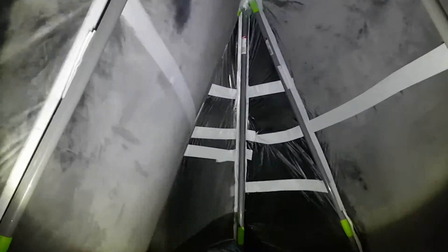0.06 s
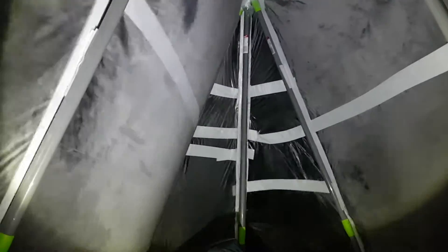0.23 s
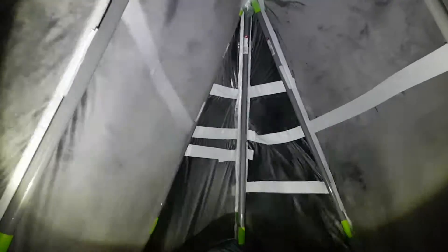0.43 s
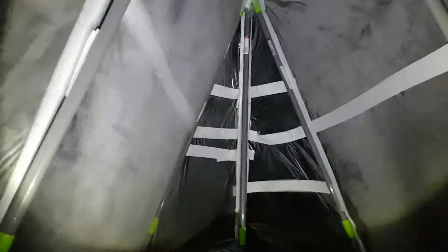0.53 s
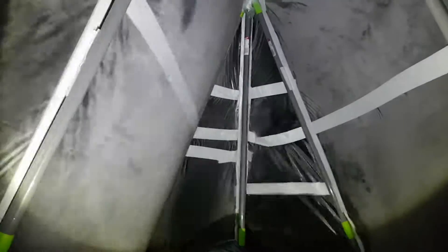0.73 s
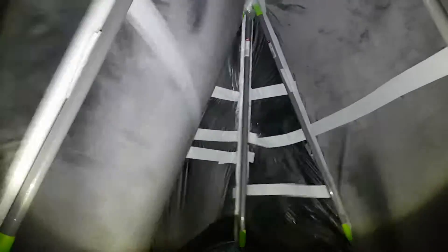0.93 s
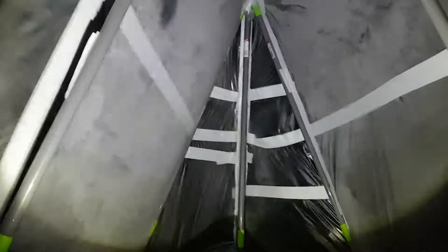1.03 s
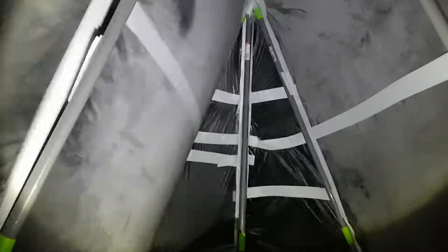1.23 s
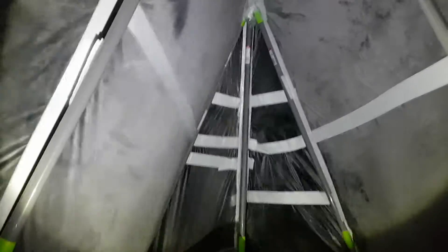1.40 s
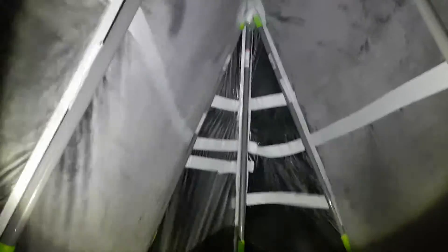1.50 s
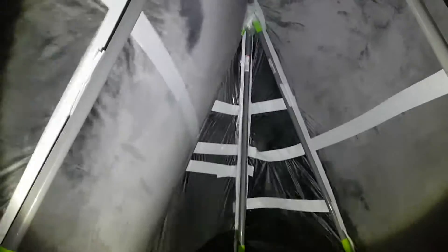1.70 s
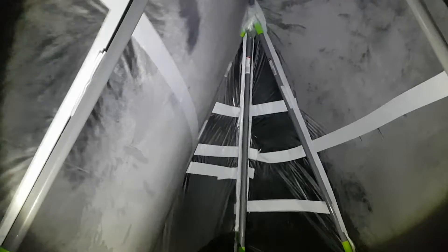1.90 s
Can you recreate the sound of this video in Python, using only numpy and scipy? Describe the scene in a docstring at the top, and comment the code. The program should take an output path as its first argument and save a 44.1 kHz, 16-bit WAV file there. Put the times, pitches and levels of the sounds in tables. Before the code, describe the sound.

Plastic sheeting of a small tent flaps, crackles and snaps in gusty wind, heard close inside

```python
"""Inside a taped plastic tent in gusty wind

A small tent of plastic sheeting is heard by a two-port camera microphone. Gusts drum the slack panels as
soft random blows over noise; creases crackle as dense clicks; thin film swishes past itself in bright grains
over a faint steady hiss. Now and then a panel snaps taut: a noise crack with a hollow knock, and a thump of
decaying sines. The small enclosure smears every click and adds a short tail."""
import sys
import numpy as np
from scipy import signal
from scipy.fft import rfft, irfft, next_fast_len
from scipy.io import wavfile
from scipy.ndimage import uniform_filter1d

SR = 44100
rng = np.random.default_rng(int(sys.argv[2]) if len(sys.argv) > 2 else 0)


def digitize_waveform(pressure):
    """Quantize a signal to 16-bit integers and store it at the path in sys.argv[1].

    Rows of a 2-D input are taken as channels; values are limited to [-1, 1].
    """
    field = np.atleast_2d(pressure).T
    bounded = np.clip(field, -1, 1)
    quanta = np.round(bounded * 32767).astype(np.int16)
    wavfile.write(sys.argv[1], SR, quanta)


def voltage_ratio(level):
    """Linear amplitude factor for a level in decibels (scalar or array-like)."""
    return 10 ** (np.asarray(level, float) / 20)


N = 85995
SPOTS = 12  # places on the walls where the sheet works


def read(table, hz):
    """Reads a table of (Hz, value) on a log frequency axis, holding the end values."""
    f, value = np.array(table, float).T
    return np.interp(np.log(np.maximum(hz, 1)), np.log(f), value)


def colour(x, table):
    """Causal minimum-phase filter with the given spectrum, scaled to keep white noise at its rms."""
    size = next_fast_len(N + 8192)
    hz = np.arange(2049) * SR / 4096
    low_end = (table[0][0] / 2, table[0][1] - 12)  # 12 dB down an octave below the first row
    db = read([low_end] + list(table), hz)
    cepstrum = np.fft.irfft(db * np.log(10) / 20)
    # folding the cepstrum makes the filter causal
    cepstrum[1:2048] *= 2
    cepstrum[2049:] = 0
    h = np.fft.irfft(np.exp(np.fft.rfft(cepstrum)))
    h = h / np.sqrt(np.sum(h ** 2))
    return irfft(rfft(x, size) * rfft(h, size), size)[..., :N]


def walk(rate_hz):
    """Random levels held 1 / rate_hz seconds each and slewed twice; standard deviation 1."""
    hold = int(SR / rate_hz)
    steps = np.repeat(rng.standard_normal(N // 100), hold)[:N]
    w = uniform_filter1d(uniform_filter1d(steps, hold), hold)
    return w / w.std()


def clicks(per_s, scatter_db):
    """Random clicks of both signs, many small and few large; rms 1."""
    chance, sign, size = rng.random(N), rng.standard_normal(N), rng.exponential(size=N)
    happens = chance < per_s / SR
    x = happens * np.sign(sign) * voltage_ratio(scatter_db * np.minimum(size, 4.5))
    return x / x.std()


def scatter(x, hold_s):
    """Hands the sound at random from place to place on the walls, hold_s seconds at each."""
    place = np.repeat(rng.integers(0, SPOTS, N), max(int(hold_s * SR), 1))[:N]
    return x * (place == np.arange(SPOTS)[:, None])


# The gusts as they drive the sheet, before flutter.
# Each row: time in seconds, drumming of the panels in dB, crackle of the creases in dB.
GUSTS = [(0, -32.5, -35), (.064, -33.5, -35.5), (.17, -32, -35), (.225, -27.5, -27), (.282, -21.5, -22.5),
         (.35, -25.5, -26), (.384, -22, -25), (.41, -16, -20.5), (.445, -19.5, -21.5), (.475, -17.5, -24.5),
         (.53, -23, -23), (.564, -21, -25.5), (.596, -21.5, -22), (.65, -22.5, -21), (.70, -22, -25.5),
         (.732, -21, -22), (.782, -20, -21), (.84, -20.5, -23.5), (.89, -16, -19.5), (.938, -19, -21),
         (.97, -19.5, -26.5), (1.03, -19.5, -20), (1.062, -26.5, -25.5), (1.09, -16, -24),
         (1.14, -27.5, -27), (1.185, -21.5, -24), (1.222, -33, -34), (1.26, -33.5, -25), (1.31, -26.5, -32),
         (1.355, -28, -29), (1.39, -27, -26), (1.43, -27, -27), (1.454, -28, -33), (1.51, -29, -32),
         (1.54, -33.5, -37), (1.606, -37.5, -41), (1.70, -34, -36.5), (1.764, -36.5, -40.5),
         (1.824, -31.5, -41.5), (1.894, -34.5, -38.5), (1.95, -37, -45.5)]
# Spectrum of a slack panel. Each row: frequency in Hz, relative level in dB per Hz.
PANEL_COLOUR = [(12, -16), (20, -18.5), (75, -0.5), (134, -2), (173, -5), (244, -4), (429, -13.5),
                (659, -16), (1200, -22), (1560, -27), (2640, -120)]


def drumming(t, flutter_db):
    """Eddies push the slack panels: soft random blows over turbulent pressure, nearly alike at both ports."""
    push = 0.76 * clicks(per_s=400, scatter_db=2) + rng.standard_normal(N)
    side = voltage_ratio(-13) * rng.standard_normal(N)
    ports = push + side * np.array([[1], [-1]])
    gust_s, gust_db, _ = np.array(GUSTS).T
    db = np.interp(t, gust_s, gust_db) + 0.52 * flutter_db  # the drumming flutters less than the creases
    return colour(voltage_ratio(db) * ports, PANEL_COLOUR)


# Spectrum of the buckling creases. Each row: frequency in Hz, relative level in dB per Hz.
CREASE_COLOUR = [(150, -41.5), (250, -17), (330, -9.5), (372, -14.5), (594, -10.5), (2820, -14),
                 (6150, -26.5), (7700, -27.5), (9150, -36.5), (13600, -38.5), (15600, -43)]


def creases(t, flutter_db):
    """Dense buckling clicks of the crumpled sheet, in flurries as the panels flutter."""
    gust_s, _, crackle_db = np.array(GUSTS).T
    db = np.interp(t, gust_s, crackle_db) + flutter_db + 0.2 * walk(60.43)
    crackle = voltage_ratio(db) * clicks(per_s=4000, scatter_db=2.5)
    return colour(scatter(crackle, hold_s=.0002), CREASE_COLOUR)


# Swishes of film sliding over film. Each row: centre in seconds, length in seconds, level in dB.
SWISHES = [(0.065, 0.042, -35), (0.11, 0.02, -33), (0.153, 0.045, -38), (0.31, .09, -38),
           (0.386, 0.017, -23.5), (.41, 0.046, -29.5), (0.504, 0.0043, -28), (0.531, 0.038, -32),
           (0.59, .02, -38), (0.653, 0.059, -33.5), (0.698, .022, -27), (0.793, 0.046, -36.5),
           (0.886, 0.02, -28.5), (1.024, .005, -28), (1.064, .005, -33), (1.076, .004, -30),
           (1.099, .004, -30), (1.266, .032, -33), (1.339, .005, -33), (1.357, .003, -35),
           (1.37, .015, -36), (1.41, .06, -37), (1.502, .005, -38), (1.673, 0.03, -46), (1.755, 0.028, -44),
           (1.802, .006, -51), (1.903, .008, -47)]
# Spectrum of the thin film. Each row: frequency in Hz, relative level in dB per Hz.
FILM_COLOUR = [(800, -18), (2000, -7), (4000, -2), (7500, -3), (8800, -9), (10500, -9), (13000, -3),
               (15700, -8)]


def film(t):
    """Bright fine grains swell and fade while layers of thin film slide over each other."""
    power = voltage_ratio(2 * -55) * np.ones(N)  # a steady faint hiss at -55 dB lies under the swishes
    for centre_s, length_s, db in SWISHES:
        power += voltage_ratio(2 * db) * np.exp(-((t - centre_s) / (.6 * length_s)) ** 2)
    waver = voltage_ratio(0.31 * walk(43.9))
    grains = waver * np.sqrt(power) * clicks(per_s=6000, scatter_db=2.5)
    return colour(scatter(grains, hold_s=.0002), FILM_COLOUR)


# Snaps of a panel pulled taut.
# Each row: start in seconds, crack in dB, thump in dB, crack pitch in Hz, thump pitch in Hz.
SNAPS = [(.110, -30, -23, 2600, 150), (0.27, -21, -30, 1970, 129), (0.3857, -11.5, -31, 2850, 201),
         (0.4011, -8, -15, 1930, 152), (.415, -21, -32, 2000, 170), (0.4223, -19, -36, 2980, 130),
         (0.4334, -30, -10.5, 2940, 117), (0.5894, -18.5, -21, 1440, 140), (.782, -30, -10, 2500, 200),
         (0.715, -17, -33, 2500, 140), (0.8478, -14.5, -24, 2600, 108), (.880, -14.5, -40, 2500, 190),
         (1.004, -10.5, -26, 1880, 139), (1.0738, -7, -3, 3200, 130), (1.0850, -12, -18, 3300, 140),
         (1.0985, -28, -36, 5000, 127), (1.123, -21, -24, 2200, 138), (1.194, -31, -28, 2930, 140),
         (1.253, -31, -20, 3220, 200), (1.270, -20, -17, 2640, 196), (1.338, -33, -7.5, 5000, 239),
         (1.344, -17.5, -27, 2460, 250), (1.3676, -19.5, -10, 2770, 171), (1.3715, -19, -13, 2780, 200),
         (1.397, -20, -18, 2600, 200), (1.4025, -6, -13, 2400, 330), (1.4155, -8, -9, 1800, 240),
         (1.4385, -22, -17, 3000, 240), (1.4715, -17, -18, 2200, 240), (1.5015, -22, -15, 3000, 230),
         (1.812, -36, -48, 4500, 170), (1.905, -32.5, -38, 5000, 170)]
# Modes of the taut panel. Each row: multiple of the thump pitch, level in dB, cycles to fall 60 dB.
SNAP_MODES = [(1, 12, 2.5), (2.15, -8.5, 5.5)]


def snaps():
    """A snap is a short noise crack with a hollow knock, and a thump of the panel pulled inward first."""
    crack_decay_s = .0011
    knock_hz, knock_db, knock_t60_s = 720, 3, 0.022  # level relative to the crack
    t = np.arange(4096) / SR
    cracks, thumps = np.zeros((SPOTS, N + 4096)), np.zeros(N + 4096)
    envelope = np.exp(-t / crack_decay_s) * (1 - np.exp(-t / .0004))
    knock = np.sin(2 * np.pi * knock_hz * t) * voltage_ratio(knock_db - 60 * t / knock_t60_s)
    for k, (at_s, crack_db, thump_db, crack_hz, thump_hz) in enumerate(SNAPS):
        i = int(at_s * SR)
        band = signal.butter(4, [crack_hz / 3.5, crack_hz * 1.4], "band", fs=SR, output="sos")
        grit = signal.sosfilt(band, rng.standard_normal(4096) * envelope)
        grit = grit / np.sqrt(np.sum(grit ** 2) / (crack_decay_s * SR))
        place = SPOTS - 2 - k % 3  # three neighbouring places take turns
        cracks[place, i:i + 4096] += voltage_ratio(crack_db) * (grit - knock)
        ring = np.zeros(4096)
        for multiple, db, cycles in SNAP_MODES:
            hz = multiple * thump_hz
            ring += np.sin(2 * np.pi * hz * t) * voltage_ratio(db - 60 * hz * t / cycles)
        thumps[i:i + 4096] -= voltage_ratio(thump_db) * ring * (1 - np.exp(-t / .002))  # inward first
    return cracks[:, :N], thumps[:N]


# Likeness of the tent's tail at the two ports. Each row: frequency in Hz, share common to both (0 to 1).
TAIL_ALIKE = [(60, 0.71), (150, 0.32), (300, 0.26), (640, 0.06), (1200, 0.05), (16000, 0.018)]


def tent(spots, wet_db, tilt_db_per_octave):
    """Each wall place has its own buckling smear, tilt, port lag and short tail, most alike in the bass."""
    buckle_decay_s, tail_t60_s, lead_s = 0.00042, 0.037, .001
    t, hz = np.arange(8192) / SR, np.arange(4097) * SR / 8192
    # how late the right port hears each place, in seconds, from one side to the other
    lag = np.interp(np.sqrt(np.linspace(0, 1, SPOTS)), (0, 1), (-.0003, .0006))[:, None]
    burst = rfft(rng.standard_normal((SPOTS, 8192)) * np.exp(-t / buckle_decay_s))
    burst = burst / np.abs(burst)  # flat spectrum: it smears but does not colour
    direct = np.array([burst * np.exp(-2j * np.pi * hz * (lead_s + port * lag / 2)) for port in (-1, 1)])

    tail_envelope = voltage_ratio(-60 * t / tail_t60_s) * (1 - np.exp(-t / 0.0021))
    mid, side = rfft(rng.standard_normal((2, SPOTS, 8192)) * tail_envelope)
    common = np.clip(read(TAIL_ALIKE, hz), 0, 1)
    tail = np.array([mid * np.sqrt(1 + common) + sign * side * np.sqrt(1 - common) for sign in (1, -1)])
    tail = tail / np.sqrt(np.mean(np.abs(tail) ** 2))

    slope = tilt_db_per_octave * rng.permutation(np.linspace(-1, 1, SPOTS))[:, None]
    tilt = voltage_ratio(slope * np.log2(np.maximum(hz, 500) / 3000))  # pivots at 3 kHz, constant below 500 Hz
    h = irfft(tilt * (direct + voltage_ratio(wet_db) * tail) / np.sqrt(1 + voltage_ratio(2 * wet_db)), 8192)
    lead = int(lead_s * SR)  # taken off again below
    return signal.fftconvolve(spots[None], h[..., :4096], axes=2).sum(axis=1)[:, lead:lead + N]


def scene():
    """Creases, film and cracks go through the tent; drumming and thumps reach the ports directly."""
    t = np.arange(N) / SR
    flutter_db = 1.9 * walk(50)
    cracks, thumps = snaps()
    crackle = tent(creases(t, flutter_db), wet_db=2, tilt_db_per_octave=2.5)
    swish = tent(film(t), wet_db=-4, tilt_db_per_octave=2.5)  # the film is close and dry
    drums = drumming(t, flutter_db)
    snap = tent(cracks, wet_db=-6, tilt_db_per_octave=0)
    return drums + thumps + crackle + swish + snap


# Colour difference of the two ports. Each row: frequency in Hz, left minus right in dB.
PORT_COLOUR = [(60, -1), (110, -0.5), (200, -1), (380, 0.5), (700, -2.5), (1290, -5), (2380, -4),
               (4400, -12), (8120, -1), (15000, 2.5)]


def microphone(dry):
    """The two ports differ in colour and cut the deepest bass; loud peaks are rounded and the top is cut."""
    db = read(PORT_COLOUR, np.arange(N // 2 + 1) * SR / N)
    x = irfft(rfft(dry) * voltage_ratio(np.array([db, -db]) / 2), N)
    x = signal.sosfilt(signal.butter(2, 18, "high", fs=SR, output="sos"), x)
    x = np.tanh(x ** 3 / 3 + x) * .99
    return signal.sosfilt(signal.ellip(8, .2, 70, 15750, fs=SR, output="sos"), x)


def band_limit(x):
    """A steep low-pass at the top of the band."""
    return signal.sosfilt(signal.butter(12, 15800, fs=SR, output="sos"), x)


def record(dry):
    """The scene as the two-port microphone delivers it."""
    mix = microphone(dry)
    return band_limit(mix)


dry = scene()
out = record(dry)
digitize_waveform(out)
```